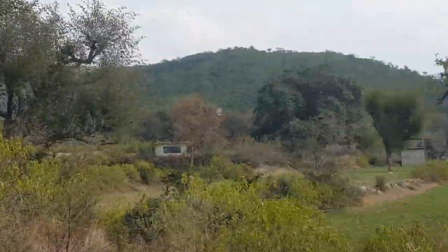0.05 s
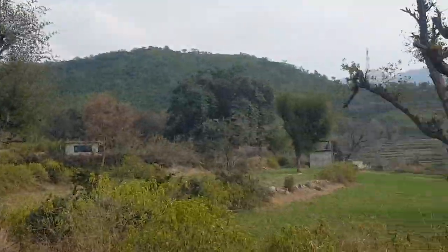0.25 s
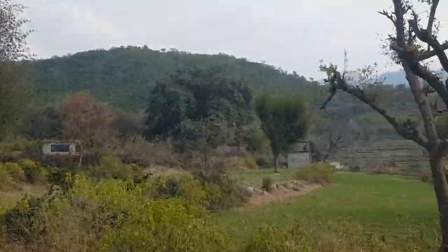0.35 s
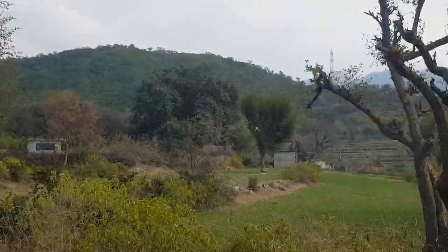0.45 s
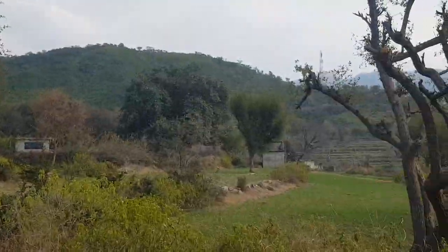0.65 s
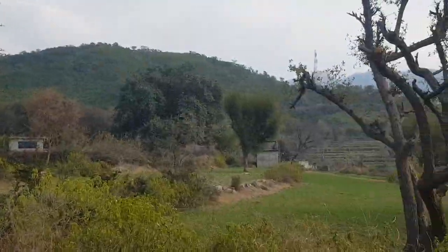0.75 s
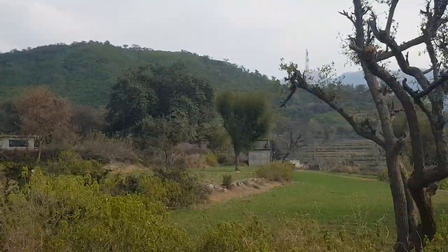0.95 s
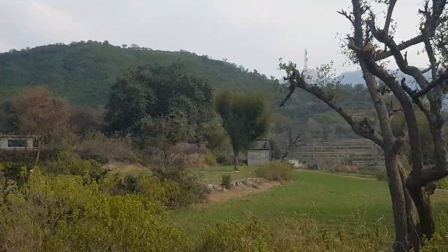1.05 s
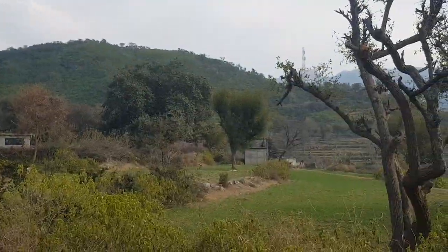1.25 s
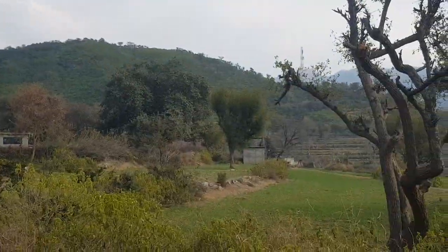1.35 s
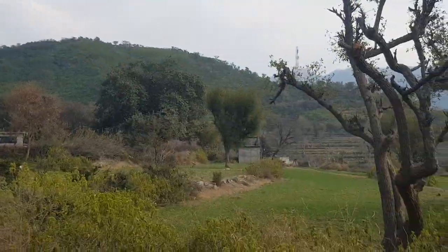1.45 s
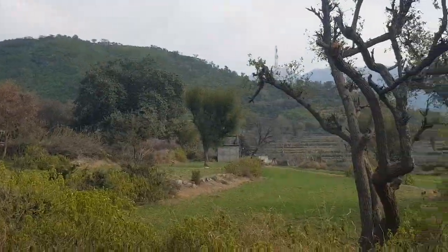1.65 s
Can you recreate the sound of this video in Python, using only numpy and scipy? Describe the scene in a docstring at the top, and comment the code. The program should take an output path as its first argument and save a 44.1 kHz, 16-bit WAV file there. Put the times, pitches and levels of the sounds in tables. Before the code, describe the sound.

A single shotgun shot cracks with a short boom over open farmland. Nearby bushes scatter it, then separate echoes and a dull, uneven roll come back from trees and a hill. Light wind rumbles on the phone microphone.

```python
"""Light wind and a thin hiss over open farmland, on a phone's two microphone ports. Then one shotgun shot:
the muzzle blast and its ground bounce hit first, then a short boom. Nearby bushes and trees scatter it
into a dense decay, tree lines and banks farther out send back separate echoes, and a distant wooded hill
rolls on, dull and uneven. A faint high hiss swells and fades."""
import sys
import numpy as np
from scipy import signal
from scipy.fft import rfft, irfft
from scipy.io import wavfile

SR = 44100
rng = np.random.default_rng(int(sys.argv[2]) if len(sys.argv) > 2 else 0)


def generate_wav(signal):
    """Clip the signal to [-1, 1] and save it as 16-bit WAV at the path in sys.argv[1]."""
    frames = np.transpose(np.atleast_2d(signal))
    scaled = np.clip(frames, -1, 1) * 32767
    pcm = np.round(scaled).astype(np.int16)
    wavfile.write(sys.argv[1], SR, pcm)


N = 74970
SHOT_S = 0.2186


def undb(db):
    """Decibels to gain."""
    return 10 ** (np.asarray(db) / 20)


def at_hz(points, hz):
    """Read (f/Hz, value) points on a log-frequency axis."""
    freqs, values = np.array(points, float).T
    return np.interp(np.log(np.maximum(hz, 1)), np.log(freqs), values)


def gain_curve(points):
    """Gain at every sample from (t/s, level/dB) points."""
    times, levels = np.array(points, float).T
    return undb(np.interp(np.arange(N) / SR, times, levels))


def since(start):
    """Seconds since start, zero before it."""
    return np.maximum(np.arange(N) / SR - start, 0)


def add(track, start, sound):
    """Mix a sound into the track at start seconds."""
    part = track[int(start * SR):][:len(sound)]
    part += sound[:len(part)]


def colour(x, points, size=4096):
    """Causal filter through (f/Hz, level/dB) points."""
    gain = undb(at_hz(points, np.fft.rfftfreq(size, 1 / SR)))
    cepstrum = irfft(np.log(gain))
    cepstrum[1:size // 2] *= 2  # fold to minimum phase: nothing rings ahead of a hit
    cepstrum[size // 2 + 1:] = 0
    impulse = irfft(np.exp(rfft(cepstrum)))[None, :size // 2]
    return signal.oaconvolve(np.atleast_2d(x), impulse, axes=1)[:, :N].reshape(x.shape)


def fade_bands(x, db_per_s, size=512):
    """From the shot on, every frequency fades at its own rate db_per_s(hz)."""
    hz, t, frames = signal.stft(x, SR, nperseg=size)
    loss_db = np.outer(db_per_s(hz), np.maximum(t - SHOT_S, 0))
    return signal.istft(frames * undb(-loss_db), SR)[1][:, :N]


def ports(shared, own):
    """Both microphone ports hear much the same bass, but each its own treble."""
    # likeness of the ports: f/Hz, shared part of the power (clipped to 0-1)
    likeness = [(60, 0.74), (150, 1.4), (330, 0.25), (650, 0.52), (1200, -0.35), (16000, -0.5)]
    share = np.clip(at_hz(likeness, np.fft.rfftfreq(N, 1 / SR)), 0, 1)
    return irfft(rfft(shared) * np.sqrt(share) + rfft(own) * np.sqrt(1 - share), N)


def reflections(per_s, spread_db=3.5):
    """A stereo hail of small reflections of uneven size, rms about 1."""
    arrivals = rng.random((3, N)) < per_s / SR
    polarity = np.sign(rng.standard_normal((3, N)))
    sizes = undb(spread_db * rng.standard_normal((3, N)))
    hail = arrivals * polarity * sizes
    hail /= hail.std()
    return ports(hail[0], hail[1:])


def wind():
    """Light wind rumbles on each microphone port."""
    # gusts: t/s, level/dB
    gusts = [(0, -30.5), (0.08, -43), (0.14, -34.5), (0.19, -45.5), (0.4, -40), (1.3, -51), (1.7, -49)]
    # wind spectrum: f/Hz, level/dB
    spectrum = [(20, -7.5), (65, 7.5), (120, -3), (220, -17.5), (600, -25), (1400, -39), (4000, -59.5)]
    return colour(rng.standard_normal((2, N)), spectrum) * gain_curve(gusts)


def thin_hiss():
    """A thin hiss lies underneath and dips after the shot."""
    # course of the hiss: t/s, level/dB
    levels = [(0, -64), (0.21, -63.5), (0.4, -74), (0.75, -69), (0.95, -76.5), (1.4, -79), (1.7, -75)]
    # hiss spectrum: f/Hz, level/dB
    spectrum = [(500, 1), (2200, -7), (3000, 2), (3800, -8), (8000, -18), (10000, -8), (12000, -1),
                (14000, -5), (16000, 0)]
    lean_left = undb([[1], [-1]])
    return colour(rng.standard_normal((2, N)) * lean_left, spectrum) * gain_curve(levels)


def muzzle_blast(right_lag_s=0.00013):
    """Each shock front jumps up, falls through zero and sucks back; the left port hears it first."""
    # shock fronts, direct and off the ground: t/s, level/dB, length of the overpressure/ms
    fronts = [(0.219, 0, 0.34), (0.2204, -8.5, .5)]
    # tone of the fronts: f/Hz, level/dB
    tone = [(30, -10), (150, -0.5), (450, 14), (900, -1), (2800, -6.5), (5000, -8.5), (8000, -23.5),
            (11500, -12), (16000, -2)]
    pressure = np.zeros((2, N))
    for start, db, length_ms in fronts:
        age = np.array([since(start), since(start + right_lag_s)])
        lengths = age * 1000 / length_ms
        pressure += undb(db) * (age > 0) * (1 - lengths) * np.exp(-np.minimum(lengths, 20))
    return colour(pressure, tone)


def boom(start_s=0.2216, pitch_hz=100, sag=0.18, db=-0.5, rise_s=0.0027, decay_s=0.0072):
    """The low swing of air behind the fronts: a few cycles that sag in pitch."""
    age = since(start_s)
    rise = 1 - np.exp(-age / rise_s)
    decay = np.exp(-age / decay_s)
    hz = pitch_hz * (1 - sag * (1 - decay))
    return undb(db) * np.sin(2 * np.pi * hz * age) * rise * decay


def bushes(rise_s=0.0012, thicket_s=0.042, beyond_db=-6.5):
    """Dense scatter, strongest from the growth nearest the microphone; the treble dies first."""
    # spectrum of the scatter: f/Hz, level/dB
    spectrum = [(25, -5.5), (50, 0.5), (100, 0), (180, 5), (450, -4.5), (700, -9.5), (1100, -9.5),
                (2000, -16.5), (2900, -14), (5000, -27), (8000, -42), (11500, -26), (16000, -34.5)]
    # ring time of the bushes: f/Hz, t60/s
    t60 = [(40, .3), (100, 0.48), (250, .52), (700, 0.49), (2500, 0.43), (5000, 0.42), (12000, 0.29)]
    age = since(SHOT_S)
    hail = fade_bands(reflections(per_s=9000), lambda hz: 60 / at_hz(t60, hz))
    beyond = 1 - 1 / (1 + (age / thicket_s) ** 8)  # 0 while the nearest thicket answers, then 1
    rise = 1 - np.exp(-age / rise_s)
    return colour(hail * undb(beyond_db * beyond) * rise, spectrum)


def tree_lines(rise_s=0.00081, slap_width_s=0.00041, treble_hz=880):
    """Each tree line or bank returns one firm slap and a cluster of reflections, brighter or duller."""
    # echoes: t/s, cluster level/dB, decay/s, treble gain/dB, slap level/dB
    echoes = [(0.257, -9, 0.025, 4.5, -13), (0.292, -10.5, .008, -7, -17), (0.333, -20.5, 0.036, -2, -31),
              (0.359, -10.5, 0.013, 3.5, -23), (0.406, -20.5, 0.013, 5.5, -25), (0.46, -37, 0.014, 15, -65),
              (0.512, -52.5, 0.036, 23, -68), (0.598, -22.5, 0.0074, -2, -43.5),
              (0.637, -26, 0.019, 11, -64), (0.679, -26.5, 0.017, -8, -58), (0.698, -19.5, 0.0024, -3, -38),
              (0.717, -24, 0.011, -8, -34), (0.735, -27, 0.0086, -13, -34), (0.803, -27.5, 0.06, -2.5, -64),
              (0.832, -35, 0.027, 2, -30), (0.908, -35.5, 0.011, 9.5, -54),
              (0.975, -27, 0.0081, -14, -47.5), (0.995, -29.5, 0.01, -14, -47),
              (1.038, -34, 0.0096, -8, -57), (1.108, -33.5, 0.013, -3, -48.5),
              (1.149, -40.5, 0.013, 6, -42.5), (1.201, -35.5, 0.011, -17, -51),
              (1.228, -32, 0.012, -7, -80), (1.435, -43.5, 0.019, -2.5, -55), (1.68, -44, .03, -13.5, -73)]
    # tone of all the echoes: f/Hz, level/dB
    tone = [(30, -10.5), (90, 2.5), (170, -12.5), (350, -1.5), (620, 0), (800, -9), (1100, -13.5),
            (1800, -16), (3200, -25.5), (5000, -35), (8000, -49.5), (12000, -40.5), (16000, -52)]
    age = np.arange(8192) / SR
    swing = np.minimum(age / slap_width_s - 5, 8)
    slap = -swing * np.exp((1 - swing ** 2) / 2)  # one push and pull, peak 1
    body_gain, treble_gain, slaps = np.zeros((3, N))
    for start, db, decay_s, treble_db, slap_db in echoes:
        cluster = undb(db) * np.exp(-age / decay_s) * (1 - np.exp(-age / rise_s))
        add(body_gain, start, cluster)
        add(treble_gain, start, undb(treble_db) * cluster)
        add(slaps, start, undb(slap_db) * slap)
    hail = reflections(per_s=3800)
    body = signal.sosfiltfilt(signal.butter(2, treble_hz, fs=SR, output="sos"), hail)
    treble = hail - body
    return colour(body_gain * body + treble_gain * treble + slaps, tone)


def hill():
    """Scattered returns from the far wooded slope merge into a roll over a bass rumble."""
    # swells of the roll and of the rumble: t/s, level/dB
    roll_levels = [(0.3, -53), (0.45, -64), (0.55, -45), (0.62, -44), (0.73, -41), (0.78, -35),
                   (0.85, -32.5), (0.89, -59), (0.95, -45.5), (1.03, -41.5), (1.12, -47), (1.25, -53.5),
                   (1.34, -53), (1.42, -58.5), (1.56, -67.5), (1.7, -64.5)]
    rumble_levels = [(0.25, -33), (0.37, -25.5), (0.47, -23.5), (0.58, -28), (0.66, -28.5), (0.77, -36),
                     (0.83, -27), (0.9, -22), (0.97, -37.5), (1.06, -26.5), (1.13, -48), (1.27, -44.5),
                     (1.35, -50.5), (1.45, -42), (1.55, -60), (1.7, -62)]
    # their spectra: f/Hz, level/dB
    roll_spectrum = [(60, -15), (180, -11), (350, -1.5), (620, 0), (800, -8), (1100, -15), (2000, -10.5),
                     (3200, -16), (5000, -24), (8000, -39), (16000, -51.5)]
    rumble_spectrum = [(25, -21.5), (50, -3), (85, 1), (120, -4.5), (180, -14.5), (350, -27), (1000, -52.5),
                       (4000, -82.5)]
    after_shot = since(SHOT_S) > 0
    roll = reflections(per_s=2400) * gain_curve(roll_levels) * after_shot
    rumble = reflections(per_s=1500) * gain_curve(rumble_levels) * after_shot
    return colour(roll, roll_spectrum) + colour(rumble, rumble_spectrum)


def air_loss(returns, db_per_s_at_1khz=3.57):
    """The longer a return travels over the fields, the more treble the air takes."""
    return fade_bands(returns, lambda hz: db_per_s_at_1khz * (hz / 1000) ** 1.2)


def faint_high_hiss():
    """A faint high hiss swells and fades."""
    # swell of the high hiss: t/s, level/dB
    levels = [(0.35, -100), (0.48, -71), (0.72, -73), (0.85, -78), (0.97, -100)]
    # its spectrum: f/Hz, level/dB
    spectrum = [(3000, -6.5), (6000, 1), (9000, -7.5), (12000, -6), (16000, -10)]
    return colour(rng.standard_normal((2, N)), spectrum) * gain_curve(levels)


def scene():
    """From the microphone's place in the field: the shot, its near and far returns, wind and hiss."""
    far = air_loss(tree_lines() + hill())
    high_hiss = faint_high_hiss()
    near = muzzle_blast() + boom() + bushes()
    return near + far + high_hiss + wind() + thin_hiss()


def record(dry, ceiling=1.7, top_hz=15900):
    """The right port is louder and brighter; the phone rounds the peaks and cuts the top."""
    # right port above the left: f/Hz, level/dB
    imbalance = [(60, 3), (170, 1), (350, 8.8), (700, 1.7), (1400, 4), (2800, 9), (5200, 4.5), (8000, 10),
                 (12000, 13), (16000, 5.3)]
    left = colour(dry[0], [(hz, -db / 2) for hz, db in imbalance])
    right = colour(dry[1], [(hz, db / 2) for hz, db in imbalance])
    rounded = ceiling * np.tanh(np.array([left, right]) / ceiling)
    return signal.sosfilt(signal.ellip(10, 0.2, 80, top_hz, fs=SR, output="sos"), rounded)


dry = scene()
out = record(dry)
generate_wav(out)
```